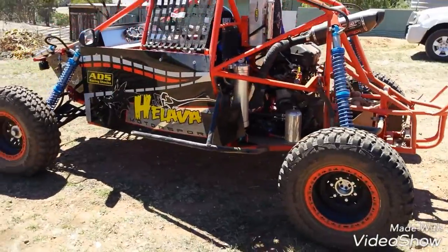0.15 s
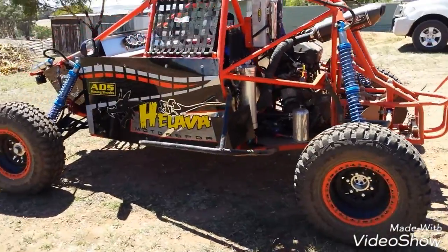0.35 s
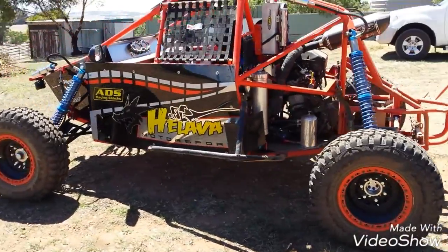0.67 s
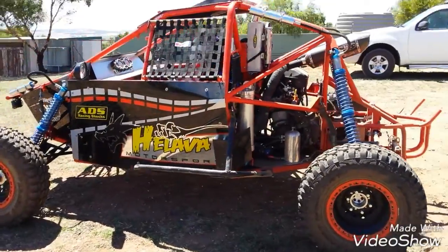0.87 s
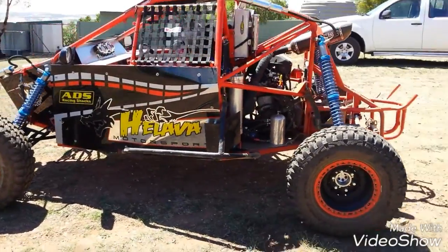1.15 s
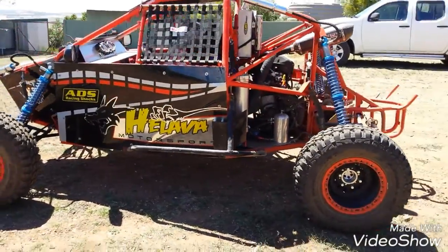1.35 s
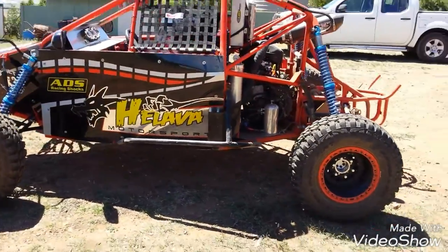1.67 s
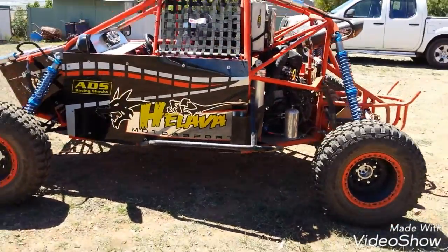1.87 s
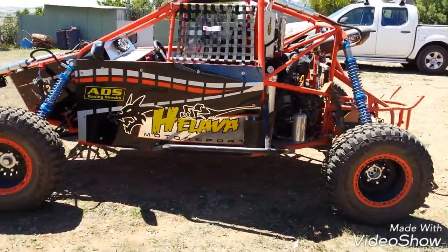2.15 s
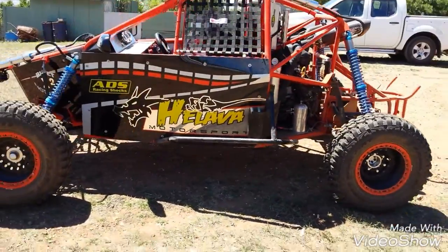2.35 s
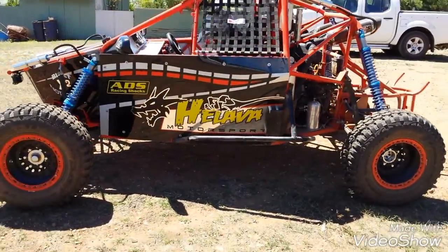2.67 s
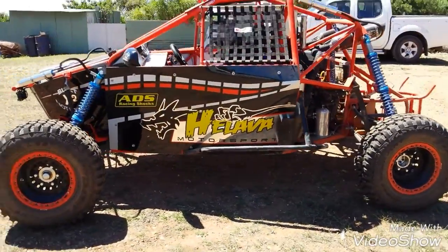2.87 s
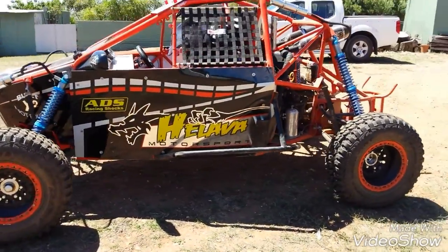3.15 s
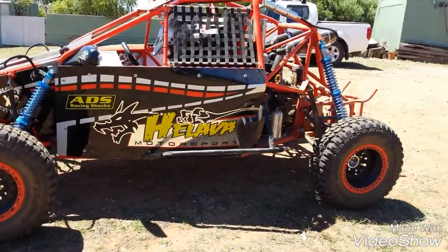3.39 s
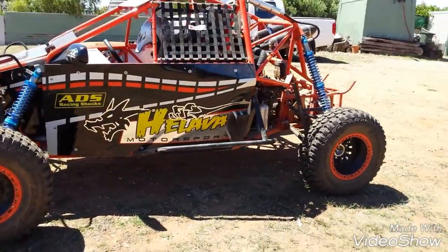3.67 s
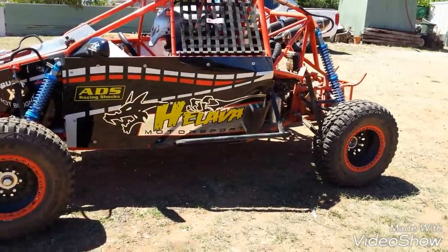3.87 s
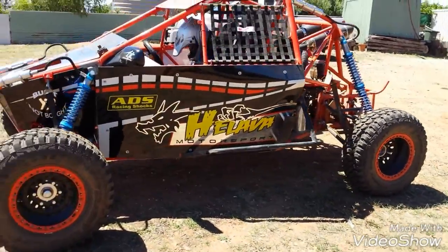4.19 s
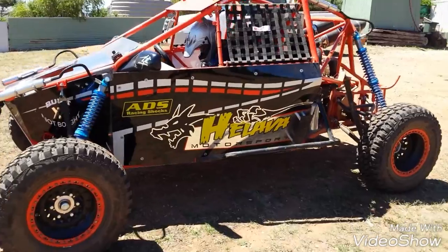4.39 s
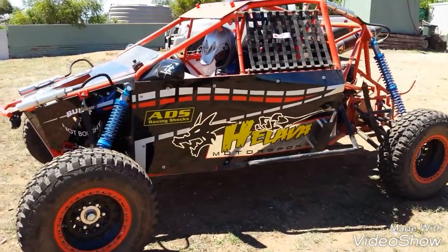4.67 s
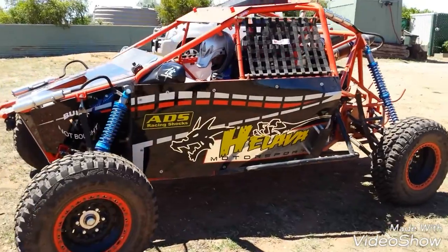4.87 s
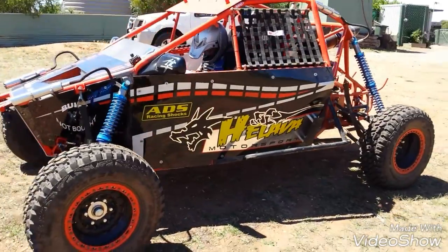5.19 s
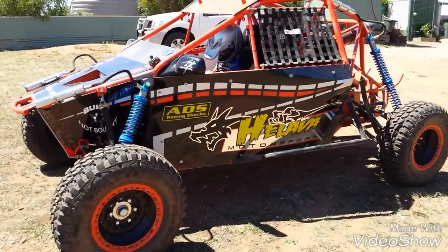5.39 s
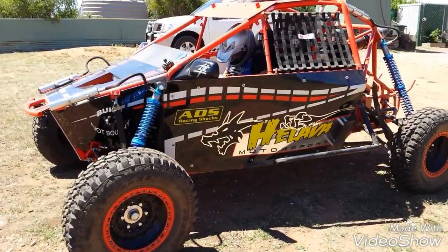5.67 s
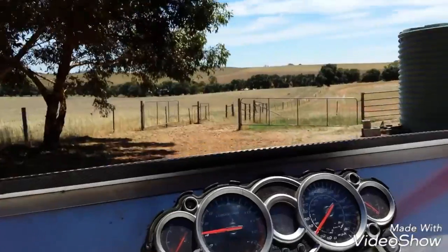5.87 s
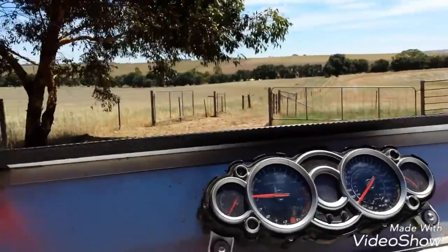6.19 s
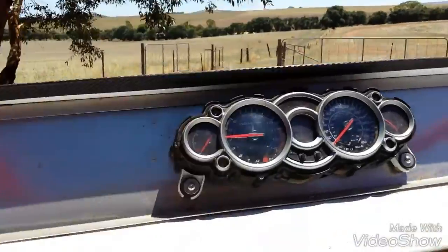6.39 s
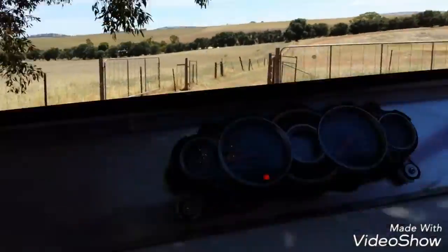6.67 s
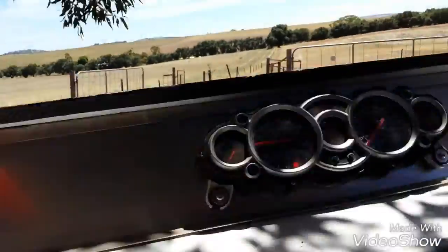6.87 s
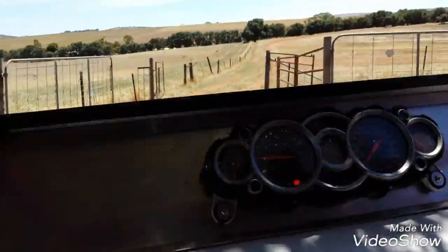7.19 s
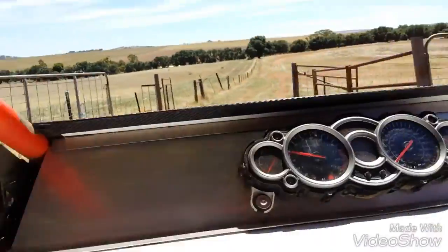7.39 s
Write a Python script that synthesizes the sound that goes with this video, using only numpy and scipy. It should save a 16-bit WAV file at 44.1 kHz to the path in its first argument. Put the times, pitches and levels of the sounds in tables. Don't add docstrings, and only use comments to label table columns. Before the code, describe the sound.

A buggy engine idles close by, surging and sagging over and over, then after a brief silence it pulls away amid rattle and buffeting wind.

```python
import sys
import numpy as np
from scipy import signal
from scipy.fft import rfft, irfft
from scipy.io import wavfile
from scipy.ndimage import uniform_filter1d

SR = 44100
rng = np.random.default_rng(int(sys.argv[2]) if len(sys.argv) > 2 else 0)


def volts(x):
    e = np.asarray(x, float) / 20
    return 10 ** e


def output_pcm(signal):
    pcm = np.clip(np.atleast_2d(signal).T, -1, 1) * 32767
    wavfile.write(sys.argv[1], SR, np.round(pcm).astype(np.int16))


N = 332514
T = np.arange(N) / SR
STANDING_END_S, DRIVE_START_S = 5.688, 6.036

# frequency in Hz, level in dB per Hz.
WIND_SPECTRUM = [(25, -38), (45, -2.5), (90, -2.5), (150, 4.5), (390, -8.5), (800, -13.5), (1500, -25),
                 (4000, -38)]
# time in seconds, level in dB.
WIND_LEVEL = [
    (6.03, -41.5),
    (6.33, -21.5),
    (6.93, -24),
    (7.43, -18.5),
    (7.54, -18),
]
# time in seconds, level in dB, left minus right in dB.
BUFFETS = [(6.276, -20, 7), (6.321, -13, -8), (6.36, -25, 8), (6.426, -26, 9), (6.46, -25, -5),
           (6.542, -7, -6), (6.679, -10, -21), (6.729, -9, -7), (6.787, -29, 5), (6.88, -20, -3),
           (6.962, -23, -2), (7.087, -10.5, -10), (7.169, -14, -22), (7.196, -20, -25), (7.287, -16, 0),
           (7.34, -16, -9), (7.379, -9, -15), (7.486, -19.5, 22), (7.53, -9, -16)]

# frequency in Hz, level near in dB, level far in dB, t60 in seconds.
PUMP_SHELL = [(3330, -9, 0, .035), (3680, 0, -8, .04), (4300, -5, -12, .025), (4910, -1, -10, .025)]
# time in seconds, level in dB.
PUMP_LEVEL = [(0, -25), (.2, -21), (.38, -21), (.45, -27), (1.1, -26), (1.5, -32), (2.1, -28), (2.6, -33),
              (4.3, -34), (4.7, -27), (5.1, -29), (5.7, -38)]
# first stroke, period, delay of the return stroke, all in seconds.
PUMP_TIMING = (.0525, 1 / 15.465, .0205)

# first tick in seconds, last in seconds, peak in dB.
TICK_RUNS = [(0.406, .69, -17), (.7462, .75, -29), (0.848, 1.25, -19), (1.48, 1.9, -22.5),
             (2.0826, 2.09, -12), (2.1405, 2.52, -23), (2.738, 3.14, -23), (3.262, 3.75, -23.5),
             (3.882, 4.45, -26), (4.56, 4.57, -35), (4.779, 4.782, -26.5), (4.8614, 4.87, -19),
             (4.9611, 5.04, -26), (5.119, 5.13, -38), (5.409, 5.66, -23.5)]
TICK_COAST_DB, TICK_DB_PER_HZ, TICK_LUCK_DB = -5.5, -0.11, 1.96
LOW_RING_DB = -5
# centre in seconds, length in seconds, level in dB, centre frequency in Hz.
AIR_ESCAPES = [
    (5.458, 0.077, -25.5, 6600),
    (1.35, 0.22, -28.5, 5300),
    (6.6, 0.096, -31, 7700),
]

# strength in dB, timing error as a share of a firing.
CYLINDERS = [(1.5, 0.016), (-0.5, 0.057), (0.5, -0.038), (-2, 0.053)]

# slowest moment in seconds, firings per second there in Hz,
# fuel cut in seconds, firings per second there in Hz.
SURGES = [(-.4, 40, .036, 67.1), (.26, 39, .675, 67.7), (.887, 38.6, 1.284, 68.2),
          (1.535, 37.3, 1.915, 66.5), (2.112, 39.5, 2.547, 69.8), (2.795, 38.8, 3.179, 69),
          (3.385, 37.8, 3.788, 69.9), (3.995, 36.9, 4.473, 68.3), (4.76, 38, 5.151, 70.1),
          (5.409, 41.6, 5.797, 70.4)]
SURGE_BURN = [2.5, 1, -0.5, 0.2, -0.9, -1.4, -0.5, -2.5, -2.5, -2.5]
CLIMB_SHAPE, COAST_SHAPE = 1.88, 1.6
RELIGHT_LEAD_S, RELIGHT_S, CUT_LEAD_S, CUT_OFF_S = 0.062, 0.26, 0.0092, 0.022

# frequency in Hz, width in Hz, level in dB.
SILENCER_MODES = [(213.3, 14, -8.5), (281, 69, 0), (343.4, 106, -4)]
# frequency in Hz, width in Hz, level in dB.
PIPE_MODES = [(90.4, 43, 3.5), (116.2, 48.5, -3)]
# frequency in Hz, width in Hz, level in dB.
TAIL_PIPE_MODE = [(189.3, 40, 0)]
# frequency in Hz, width in Hz, level in dB.
INTAKE_MODES = [(1577, 410, 5.5), (4640, 310, 2.5), (5790, 410, 1.5)]
# frequency in Hz, level in dB per Hz.
CASING_SIDE = [(260, -43), (440, -16.5), (555, -7.5), (679, 1.5), (763, -5.5), (1270, -15.5), (1380, -12),
               (2230, -13.5), (3340, -12.5), (4800, -11.5), (6310, -20.5), (8080, -21), (11800, -30.5),
               (12800, -43), (14000, -86)]
# frequency in Hz, level in dB per Hz.
CASING_FRONT = [(260, -39.5), (440, 5.5), (480, -24.5), (523, -9), (563, -10), (632, 1), (820, -6.5),
                (1080, -15.5), (1300, -6.5), (1950, -13), (3340, -14.5), (5460, -21), (6790, -25),
                (8810, -25), (14000, -54)]
HALF_ORDERS = [(1.5, .5), (2.5, .6)]
LOPE_DB = [2.5, 2.2, 2.5, .4]
THROB_DB, THROB_DB_PER_HZ, THROB_FUEL_DB = -19.5, 0.2, -2.5
BOOM_DB, BOOM_DB_PER_HZ, BOOM_FUEL_DB = -14, 0.0956, -0.9
BARK_COAST_DB, BARK_FUEL_DB = -25, 10
HISS_DB, HISS_DB_PER_HZ, HISS_LAG_S, HISS_FRONT_DB = -31, 0.1125, 0.028, -4

# time in seconds, firings per second in Hz, throttle in dB, roar in dB,
# load on the frame in dB.
DRIVE = [(6.04, 127.5, -48, -46, 3), (6.13, 131.5, -22, -33.5, 5), (6.23, 133, -12.5, -27.5, 2.5),
         (6.37, 131.9, -12.5, -22, -4), (6.48, 124.3, -25, -24.5, 4), (6.66, 113.3, -14, -23.5, 0),
         (6.7, 109.5, -35, -27, 0.5), (6.8, 118, -13, -23, 0.5), (6.84, 128, -23, -24.5, 6),
         (6.94, 133.5, -9.5, -22, 0.5), (7.12, 130.9, -18, -23.5, 2.5), (7.17, 128, -26.5, -27, 5.5),
         (7.23, 138.3, -12, -21.5, 8), (7.28, 146.2, -17, -22.5, 5.5), (7.4, 155.3, -10.5, -19, 5.5),
         (7.46, 146.2, -16.5, -20.5, 6), (7.54, 143.9, -9.5, -23, 8.5)]
# frequency in Hz, width in Hz, level in dB.
FRAME_PANELS = [(383, 150, 7.5), (530, 156, -3), (770, 270, -3.5), (1060, 320, -9), (1560, 700, -12.5)]
# frequency in Hz, level in dB per Hz.
RUSH_LEFT = [(530, -27), (900, -6), (1180, -14), (1330, -3), (2010, -1.5), (2320, -0.5), (5310, -3),
             (7230, -18), (8730, -12.5), (11300, -17), (15200, -44)]
# frequency in Hz, level in dB per Hz.
RUSH_RIGHT = [(530, -26), (900, -1.5), (1180, -17), (1330, -8), (2010, -7.5), (2320, -9.5), (5310, -11),
              (7230, -7.5), (8730, -14), (11300, -18.5), (15200, -36)]
# frequency in Hz, width in Hz, level in dB.
GEAR_MODES = [(6100, 380, -4.5), (7040, 1400, -3)]
# time in seconds, peak in dB, centre frequency in Hz.
FRAME_KNOCK = (6.886, -6, 5600)
SECOND_DB, SECOND_DB_PER_HZ, THIRD_DB = -3.5, 0.2, -9
WHINE_DB, WHINE_DB_PER_S = -10, 4.5


def noise():
    return rng.standard_normal(N)


def evened(x):
    return x / np.sqrt(np.mean(x ** 2) + 1e-20)


def levelled(x, size=6000):
    return x / np.sqrt(abs(uniform_filter1d(x ** 2, size)) + 1e-12)


def curves(rows):
    s, *columns = np.transpose(rows)
    return [np.interp(T, s, column) for column in columns]


def coloured(points):
    hz, db = np.transpose(points)
    f = np.fft.rfftfreq(N, 1 / SR)
    gain = volts(np.interp(np.log(f + 1), np.log(hz), db))
    return evened(irfft(rfft(noise()) * gain, N))


def ring(x, hz, width):
    turn = np.exp(2j * np.pi * np.cumsum(hz * np.ones(len(x))) / SR)
    pole = np.exp(-np.pi * width / SR)
    smooth = signal.lfilter([(1 - pole) ** 2], [1, -2 * pole, pole ** 2], x * turn.conj())
    return 2 * (turn * smooth).real


def modes(x, table, stretch=1):
    out = 0
    for k, (hz, width, db) in enumerate(table):
        out = out + (-1) ** k * volts(db) * ring(x, hz * stretch, width)
    return out


def burst(s, db, hz, width, decay_s):
    t = T[:1300]
    grit = ring(rng.standard_normal(1300), min(hz, 14000), width)
    grit = grit * np.exp(-t / decay_s) * np.minimum(t / 0.0018, 1)
    return round(s * SR), volts(db) * grit / abs(grit).max()


def add(mix, at, sound):
    part = mix[at:at + len(sound)]
    part += sound[:len(part)]


def wind():
    lumps = np.array([evened(uniform_filter1d(noise(), 900)) for _ in range(2)])
    level = volts(curves(WIND_LEVEL)[0] + 4.5 + 2.0 * lumps)
    for s, db, pan_db in BUFFETS:
        port_db = db - 6.5 + np.array([[0.5], [-0.5]]) * pan_db
        level = level + volts(port_db) * np.exp(-((T - s) / 0.0074) ** 2)
    own = np.array([coloured(WIND_SPECTRUM) for _ in range(2)])
    return level * (own + 0.47 * coloured(WIND_SPECTRUM))


def pump():
    first, period, back = PUMP_TIMING
    at = first + period * np.arange(88) + 0.0008 * rng.standard_normal(88)
    stroke_db = 1.8 * rng.standard_normal((88, 2)) - [0, 4]
    hits = np.bincount((np.r_[at, at + back] * SR).astype(int), volts(stroke_db).T.ravel(), N)
    t = T[:2000]
    far = np.clip((T - 1.5) / 1.65, 0, 1)
    out = 0
    for hz, near_db, far_db, t60 in PUMP_SHELL:
        shell = volts(-60 * t / t60) * np.minimum(t / 0.0008, 1) * np.sin(2 * np.pi * hz * t)
        out = out + volts(near_db + far * (far_db - near_db)) * signal.oaconvolve(hits, shell)[:N]
    return volts(curves(PUMP_LEVEL)[0]) * out


def valves(hz, fuel):
    cycles = np.cumsum(hz) / SR / len(CYLINDERS)
    out = np.zeros(N)
    for first_s, last_s, run_db in TICK_RUNS:
        start, end = np.interp([first_s, last_s], T, cycles)
        ticks_s = np.interp(np.arange(start, end + 1e-6), cycles, T)
        luck = rng.standard_normal((10, 2))
        for s, (high, low) in zip(ticks_s, luck):
            coast_db = TICK_COAST_DB * (1 - np.interp(s, T, fuel))
            speed_db = TICK_DB_PER_HZ * (np.interp(s, T, hz) - 55)
            db = run_db + coast_db + speed_db + TICK_LUCK_DB * high
            low_db = db + LOW_RING_DB + TICK_LUCK_DB * low
            add(out, *burst(s, db + 0.5, 8380, width=3050, decay_s=0.0059))
            add(out, *burst(s, low_db, 5400, width=1500, decay_s=0.0098))
    for s, length, db, centre_hz in AIR_ESCAPES:
        swell = np.exp(-((T - s) / length * 3) ** 2)
        out += volts(db) * swell * evened(ring(noise(), centre_hz, 4200))
    return out


def firings(turns, uneven_db, jitter):
    count = int(turns[-1])
    luck = rng.standard_normal((1200, 2))[:count]
    db, late = np.array(CYLINDERS)[np.arange(count) % 4].T
    at = np.interp(np.arange(count) + 0.5 + late + jitter * luck[:, 0], turns, np.arange(N))
    return np.bincount(at.astype(int), volts(db + uneven_db * luck[:, 1]), N)


def hunting():
    slow_s, slow_hz, cut_s, cut_hz = np.transpose(SURGES)
    s = np.c_[slow_s, cut_s].ravel()
    knots = np.c_[slow_hz, cut_hz].ravel()
    place = np.interp(T, s, np.arange(len(s)) * (1 - 1e-9))
    k = place.astype(int)
    u = place - k
    coast = 1 - (1 - u) ** COAST_SHAPE
    climb = np.sin(np.pi / 2 * u) ** CLIMB_SHAPE
    hz = knots[k] + (knots[k + 1] - knots[k]) * np.where(k % 2, coast, climb)
    surge = np.minimum(np.searchsorted(cut_s - CUT_LEAD_S, T), len(SURGES) - 1)
    fuel = np.clip((T - slow_s[surge] + RELIGHT_LEAD_S) / RELIGHT_S, 0, 1)
    burn_db = np.array(SURGE_BURN)[surge]
    fuel, burn_db = uniform_filter1d([fuel, burn_db], round(CUT_OFF_S * SR) + 1)
    return hz, fuel, burn_db


def lope(db):
    return db * evened(uniform_filter1d(uniform_filter1d(noise(), size=1500), size=1500))


def exhaust(hz, fuel, burn_db, front, pulses, turns):
    throb_db = THROB_DB + THROB_DB_PER_HZ * (hz - 55) + THROB_FUEL_DB * fuel + lope(LOPE_DB[0])
    boom_db = BOOM_DB + BOOM_DB_PER_HZ * (hz - 55) + BOOM_FUEL_DB * fuel + lope(LOPE_DB[1])
    bark_db = BARK_COAST_DB + BARK_FUEL_DB * fuel + burn_db + lope(LOPE_DB[2]) * (1 - 0.4 * fuel)
    rasp = noise() * volts(-33.0 - 0.44 * (bark_db + 15.5))

    stumble = volts(-9 - 0.4 * (hz - 45)) * evened(ring(noise(), hz, 16))
    throb = levelled(np.sin(2 * np.pi * turns) + stumble)

    half_orders = sum(share * np.sin(2 * np.pi * k * turns) for k, share in HALF_ORDERS)
    between = ring(half_orders, 97.5, 70)
    pipe = levelled(modes(pulses + 0.5 * rasp, PIPE_MODES))
    boom = levelled(pipe + 1.03 * np.sin(4 * np.pi * turns + 0.83) + between)

    hot = (hz / 55) ** 0.22
    bark = levelled(modes(pulses + rasp, SILENCER_MODES, stretch=hot))

    tail_db = -22.5 + 0.65 * (bark_db + 20.0) + 0.13 * (hz - 60.5) + 0.3 * front
    tail = evened(modes(pulses + rasp, TAIL_PIPE_MODE))
    return volts(throb_db) * throb + volts(boom_db) * boom + volts(bark_db) * bark + volts(tail_db) * tail


def casing_hiss(hz, front, pulses):
    late_hz = np.interp(T - HISS_LAG_S, T, hz)
    hiss_db = HISS_DB + HISS_DB_PER_HZ * (late_hz - 55) + HISS_FRONT_DB * front + lope(LOPE_DB[3])
    puffs = signal.lfilter([1], [1, -np.exp(-1 / (0.018 * SR))], pulses)
    casing = np.sqrt(1 - front) * coloured(CASING_SIDE) + np.sqrt(front) * coloured(CASING_FRONT)
    intake_db = -7.5 + 0.25 * (hz - 69.5) + 0.49 * front
    intake = volts(intake_db) * evened(modes(noise(), INTAKE_MODES))
    return volts(hiss_db + 2.5) * (casing + intake) * evened(11.0 + puffs)


def idle(hz, fuel, burn_db):
    turns = np.cumsum(hz) / SR
    front = np.clip((T - 1.5) / 5.6, 0, 1)
    pulses = firings(turns, uneven_db=1.5, jitter=0.025)
    return exhaust(hz, fuel, burn_db, front, pulses, turns) + casing_hiss(hz, front, pulses)


def drive():
    hz, first_db, rush_db, load_db = curves(DRIVE)
    body_db = rush_db + load_db
    second_db = body_db + SECOND_DB + SECOND_DB_PER_HZ * (hz - 130)
    whine_db = rush_db + WHINE_DB + WHINE_DB_PER_S * (T - DRIVE_START_S)
    turns = np.cumsum(hz) / SR

    orders = volts(first_db) * np.sin(2 * np.pi * turns)
    orders = orders + volts(second_db) * np.sin(4 * np.pi * turns + 0.12)
    orders = orders + volts(body_db + THIRD_DB) * np.sin(6 * np.pi * turns)
    orders = np.sqrt(2) * orders * volts([[0.8], [-0.8]])

    shared = firings(turns, uneven_db=-1.5, jitter=0.015) + volts(-29.5) * noise()
    panels = np.array([levelled(modes(shared + volts(-39.5) * noise(), FRAME_PANELS)) for _ in range(2)])

    flicker = np.array([evened(uniform_filter1d(noise(), 700)) for _ in range(2)])
    beat = (1 + 0.099 * np.cos(2 * np.pi * turns)) * volts(1.75 * flicker)
    rush = volts(rush_db) * np.array([coloured(RUSH_LEFT) * volts(0.5), coloured(RUSH_RIGHT) * volts(1.0)])
    gears = np.array([evened(modes(noise(), GEAR_MODES)) for _ in range(2)])
    whine = volts(whine_db + [[-5], [0.2]]) * gears

    out = orders + volts(body_db - 2.0) * panels + beat * (rush + whine)
    s, db, centre_hz = FRAME_KNOCK
    for port in out:
        add(port, *burst(s, db, centre_hz, width=4500, decay_s=0.012))
    return out


def scene():
    hz, fuel, burn_db = hunting()
    engine = idle(hz, fuel, burn_db) + valves(hz, fuel) + pump()
    standing = -0.96 * np.tanh(engine / 0.91) * np.clip((STANDING_END_S - T) / 0.0097, 0, 1)
    narrow = signal.butter(10, 12300, fs=SR, output="sos")
    standing = signal.sosfilt(narrow, standing)
    moving = (drive() + wind()) * np.clip((T - DRIVE_START_S) / 0.0033, 0, 1)
    return standing + moving


def coarse_treble(x, step_db, from_hz, db_per_khz):
    hz, t, z = signal.stft(x, SR, nperseg=2048, noverlap=1024, window="cosine")
    jumps = rng.standard_normal((len(t), 43)).T[np.arange(len(hz)) // 24]
    size = abs(z) + 1e-12
    power = (size[:, 250:420] ** 2).mean(1, keepdims=True)
    treble = np.sqrt(abs(uniform_filter1d(power, 5)))
    finer_db = db_per_khz * np.minimum(hz[:, None] - from_hz, 0) / 1000
    step = treble * volts(step_db + finer_db + 4.5 * jumps) + 1e-9
    snapped = z * np.round(size / step) * step / size
    return signal.istft(snapped, SR, nperseg=2048, noverlap=1024, window="cosine")[1][:, :N]


def top_cut(x):
    return signal.sosfilt(signal.butter(12, 15381, fs=SR, output="sos"), x)


def record(dry):
    heard = signal.sosfilt(signal.butter(3, 31, "high", fs=SR, output="sos"), dry)
    heard = signal.oaconvolve(heard, signal.firwin(301, 15400, fs=SR)[None], "same")
    heard = np.clip(1.145 * np.tanh(heard / 1.11), -1, 1)
    heard = coarse_treble(heard, step_db=-5, from_hz=9900, db_per_khz=2.5)
    return top_cut(heard)


dry = scene()
out = record(dry)
output_pcm(out)
```